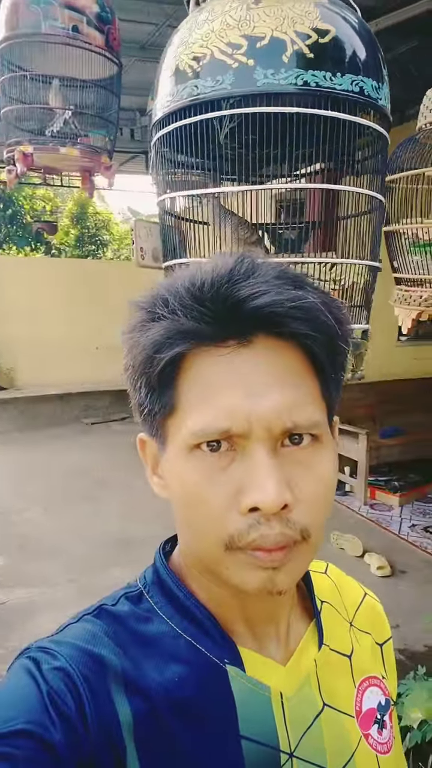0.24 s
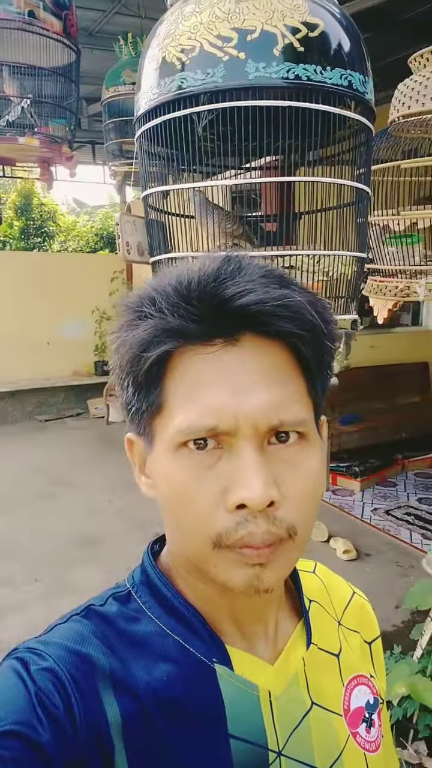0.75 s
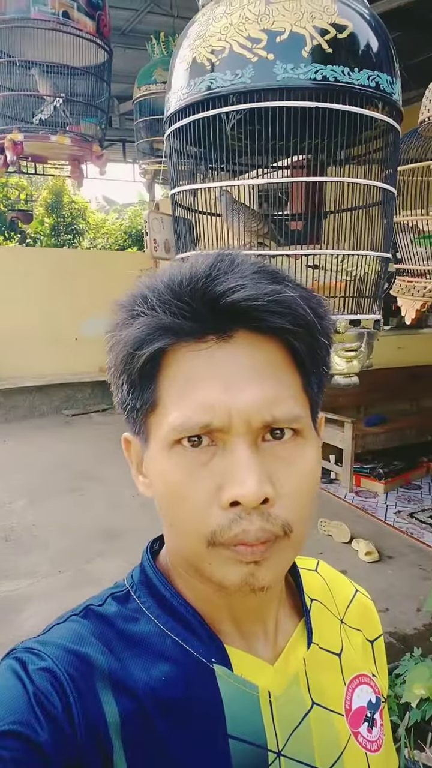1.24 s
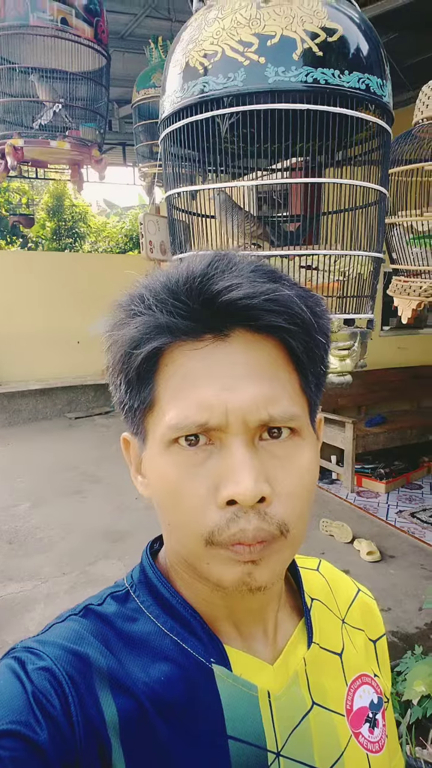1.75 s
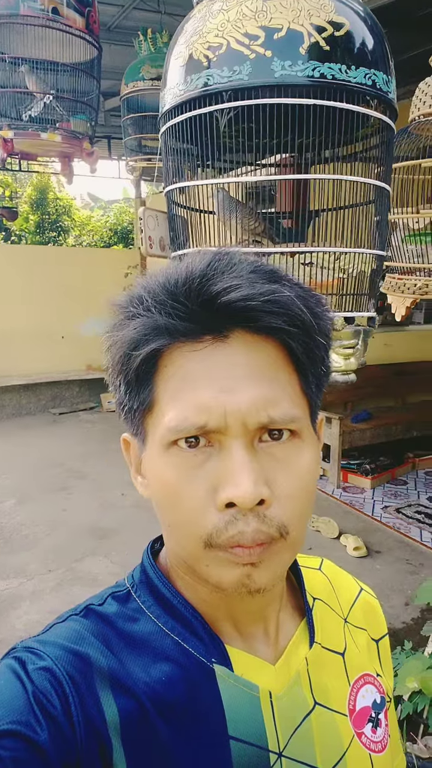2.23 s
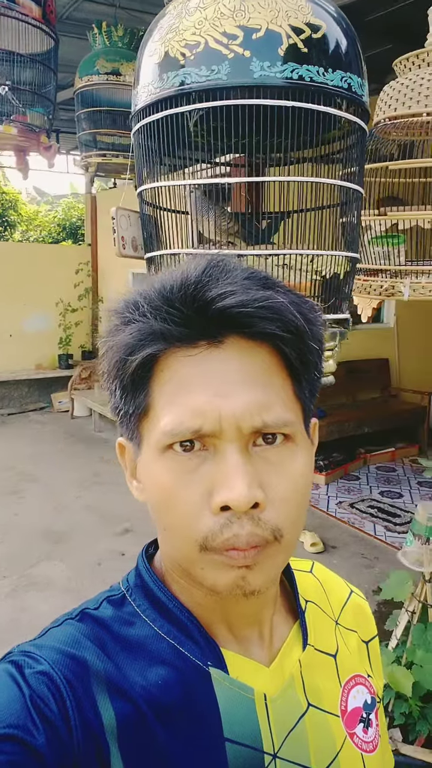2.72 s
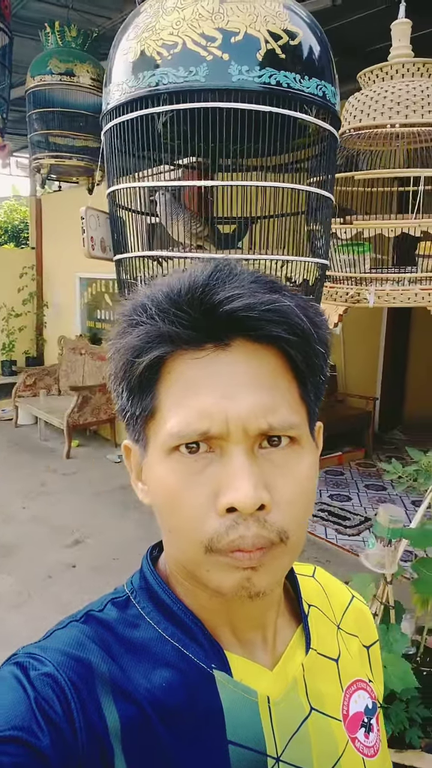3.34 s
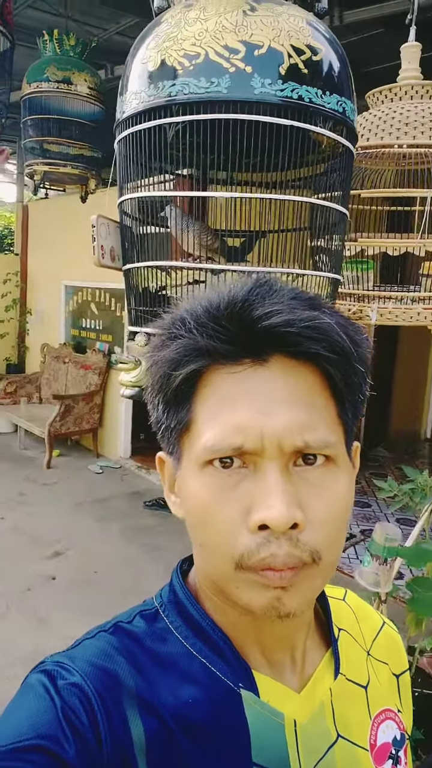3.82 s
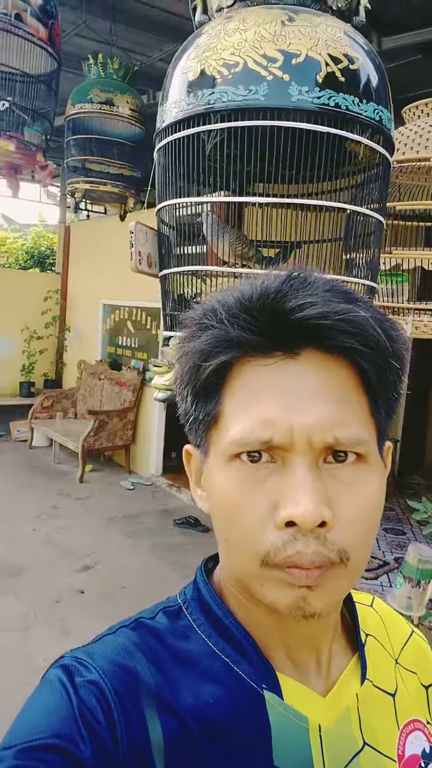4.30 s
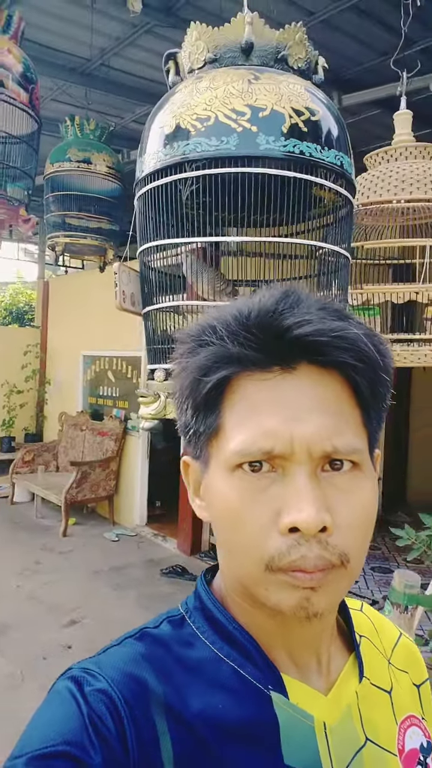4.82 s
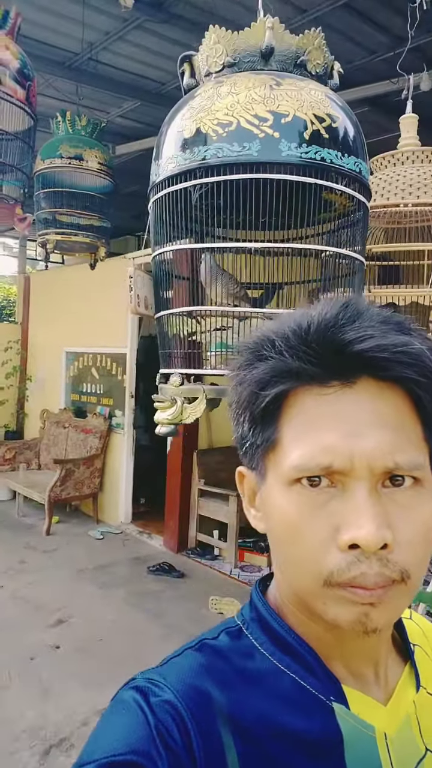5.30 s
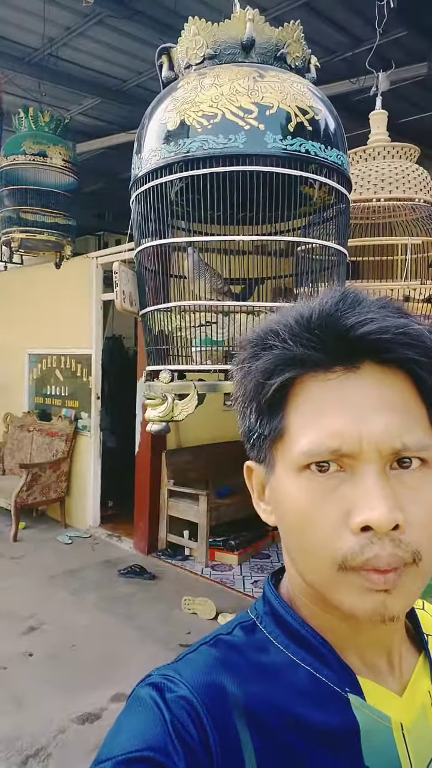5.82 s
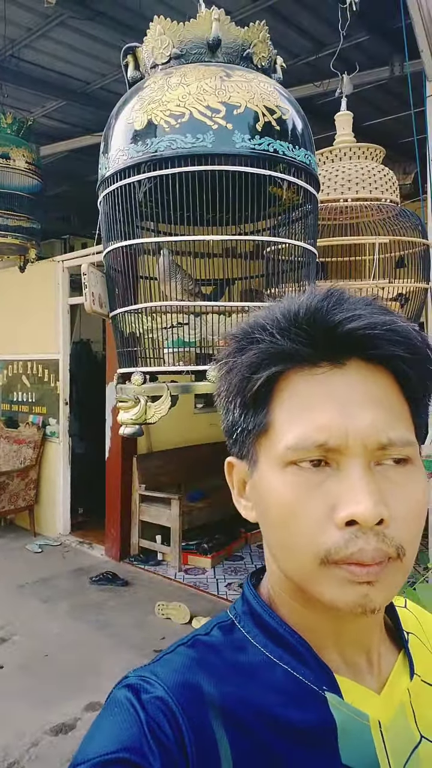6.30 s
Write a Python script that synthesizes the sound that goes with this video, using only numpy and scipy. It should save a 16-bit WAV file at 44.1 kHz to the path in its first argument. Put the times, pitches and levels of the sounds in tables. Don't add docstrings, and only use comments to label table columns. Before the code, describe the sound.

On a covered porch, a near dove sings a quick pulsed coo phrase at about two seconds and again past four. A second dove repeats one soft swelling note steadily between. Distant sparrows chirp with yard echo, a short whistle bursts in late, and claws tick on cage wire. Low motor and street rumble with hiss fade slightly. Handheld phone, no speech.

```python
import sys
import numpy as np
from scipy import signal
from scipy.fft import rfft, irfft, next_fast_len
from scipy.io import wavfile

SR = 44100
rng = np.random.default_rng(int(sys.argv[2]) if len(sys.argv) > 2 else 0)


def transcribe(u):
    v = np.clip(np.atleast_2d(u).T, -1, 1)
    q = np.round(v * 32767).astype(np.int16)
    wavfile.write(sys.argv[1], SR, q)


def gain_from_db(level_db):
    decades = np.asarray(level_db, float) / 20
    return 10 ** decades


N = 288855

# time in seconds, street level in dB.
STREET_FADE = [
    (0, -58),
    (.5, -57.5),
    (1.4, -60),
    (2.3, -59),
    (2.8, -61.5),
    (4.6, -61),
    (5.1, -63.5),
    (6.55, -64.5),
]
# frequency in Hz, density in dB per Hz.
STREET_COLOUR = [(35, -21), (60, -1), (111, -3), (165, -4.5), (446, -9.5), (534, -5), (663, -5.5),
                 (935, -8.5), (1120, -6.5), (1290, -9), (2310, -12.5), (3890, -21.5), (4500, -21.5),
                 (5850, -52.5), (9900, -120)]
# frequency in Hz, density in dB per Hz.
HISS_COLOUR = [(2060, -5.5), (3500, 2), (3900, -4), (4970, -2.5), (7650, -2), (9500, -15), (15100, -8),
               (16000, 14)]
STREET_MEAN_DB, HISS_DB = -61, -76
HISS_FOLLOWS = 1.24

# time in seconds, level in dB.
MOTOR_LOAD = [
    (0, 1.5),
    (2.5, 1.5),
    (2.75, -9),
    (4.3, 1.5),
    (4.9, -7.5),
    (6.55, -5.5),
]
# time in seconds, level in dB.
HAND_THUMPS = [
    (.84, -51),
    (2.22, -54),
    (2.5, -51),
    (4.38, -50),
    (5.03, -54),
]
MOTOR_HZ, MOTOR_SWAY_DB = 23.6, 2.5
RUMBLE_DB, FOURTH_DB, FIFTH_DB = -60.5, -62.5, -64
RUMBLE_FOLLOWS = 0.2

# time in seconds, dying time in seconds, level in dB.
PERCH_SHUFFLES = [(.03, .02, -56), (.4, .1, -59), (1.07, .12, -60), (1.37, 0.072, -50.5), (1.47, .12, -56),
                  (1.86, 0.086, -53.5), (2.05, .05, -60), (2.28, .08, -60), (2.9, .04, -55),
                  (3.14, .05, -60), (3.57, .1, -54.5), (4.17, 0.036, -51), (4.27, .02, -59),
                  (4.67, .05, -62), (5.23, 0.032, -57), (5.36, .05, -59), (5.52, 0.063, -54.5),
                  (5.93, .04, -57), (6.43, 0.066, -57)]
RUSTLE_DB, SHUFFLE_RISE_S = -60.5, 0.03
RUSTLE_FOLLOWS = 0.62
CLATTER_DB = 2

# start in seconds, length in seconds, start Hz, end Hz, level in dB.
NEAR_PIPS = [
    (.032, 0.013, 3810, 3180, -51.5),
    (.077, 0.015, 3920, 3380, -54.5),
    (.12, .014, 3560, 3300, -56),
    (.41, 0.015, 8050, 7300, -51.5),
    (5.667, 0.023, 3660, 3300, -51.5),
]

# time in seconds, peak level in dB, level of the dull part in dB.
WIRE_TICKS = [(0.079, -39, -3), (.1201, -38, -15), (1.0595, -41, -4), (1.3523, -40, -1), (1.4305, -38, -3),
              (1.4734, -36, 5.5), (2.3002, -33.5, -10), (2.4194, -47, 3), (2.7765, -42, -11),
              (2.895, -45, 0), (2.986, -45, -9), (3.1278, -44, -6), (3.5389, -41, -5), (3.5603, -33, -7.5),
              (3.5674, -39, -15), (3.5926, -31.5, -9), (3.685, -35, -17), (3.7035, -39, -18),
              (3.921, -47, -12), (4.1756, -43, -4), (4.2652, -37, -12), (4.6686, -38, -3),
              (5.1257, -46, -26), (5.222, -42, -4), (5.3542, -35, -26), (5.5244, -42, -12),
              (5.8616, -48, -20), (5.9174, -35, -10), (6.016, -34.5, -8)]
TICK_HZ = 14100

# start in seconds, length in seconds, start Hz, end Hz, level in dB.
FAR_CHIRPS = [(.40, .041, 8350, 7070, -64), (.45, .03, 6270, 5800, -67), (.47, .04, 5200, 4170, -66),
              (1.11, 0.045, 5840, 5270, -62.5), (1.16, 0.05, 5040, 4470, -65.5),
              (1.46, 0.041, 7800, 6080, -57), (2.205, 0.04, 7080, 6700, -51.5),
              (2.235, 0.027, 6430, 5280, -53), (2.30, 0.031, 6390, 4830, -49),
              (2.34, 0.014, 4760, 3920, -58), (2.61, 0.013, 7000, 6420, -58),
              (2.635, 0.027, 6260, 4730, -67), (3.62, .019, 8220, 6500, -61),
              (3.635, 0.038, 4830, 4420, -62), (4.505, .04, 4580, 4030, -65),
              (4.82, 0.027, 8800, 6400, -63), (4.83, .025, 6250, 5700, -56), (4.84, 0.035, 5530, 4430, -53),
              (5.365, 0.032, 7240, 6600, -57), (5.395, .034, 6250, 5260, -64.5),
              (5.665, .009, 4320, 3520, -52), (5.68, 0.0218, 2340, 1860, -62),
              (6.065, 0.017, 4130, 3300, -59)]
# start in seconds,
# length in seconds, start Hz, end Hz, level in dB.
SPARROW_CHEEPS = [(1.075, 0.03, 7370, 6430, -50), (1.47, 0.065, 5100, 4160, -61),
                  (1.545, 0.08, 5990, 4510, -48.5), (1.765, .054, 6235, 5000, -46.5),
                  (1.845, 0.032, 7500, 6550, -47.5), (4.14, 0.032, 8290, 7420, -62),
                  (5.36, .046, 15000, 13300, -59), (6.062, .068, 6165, 4580, -53),
                  (6.26, .058, 6210, 5060, -48.5), (6.405, 0.065, 6200, 4830, -48),
                  (6.41, 0.027, 7370, 6680, -49.5), (6.415, 0.031, 15000, 13500, -52.5)]
HOLD_PER_S = 22.0

TRILL_START_S, TRILL_RISE_S, TRILL_HOLD_S, TRILL_FALL_S = .62, .2, 0.42, 0.16
TRILL_DB, TRILL_ENTRY_DB, TRILL_EXIT_DB = -45.5, -12, -22
SYLLABLE_HZ, SYLLABLE_SAG_HZ_PER_S, SYLLABLES_PER_S = 2155, 91.2, 32

# start in seconds, length in seconds, start Hz, end Hz, level in dB.
WHISTLE_NOTES = [
    (5.333, 0.085, 3260, 3010, -56),
    (5.435, 0.059, 2670, 2960, -44),
    (5.455, 0.04, 3267, 3072, -42.5),
    (5.49, 0.064, 3144, 2896, -38),
    (5.518, .045, 2246, 2710, -39),
    (5.577, 0.028, 2727, 2738, -32),
    (.66, .066, 2445, 2478, -57),
    (.77, .075, 2440, 2374, -61),
]
# multiple of the pitch, level in dB.
WHISTLE_OVERTONES = [
    (2, -39),
    (4, -29.5),
    (5, -28),
]

# start in seconds, swell delay in seconds, top pitch in Hz, level in dB.
ANSWER_NOTES = [(1.663, .071, 1263, -40.5), (2.014, 0.086, 1268, -38.5), (2.26, 0.088, 1251, -35),
                (2.503, 0.095, 1247, -37), (2.76, 0.093, 1243, -36.5), (3.013, 0.101, 1242, -36.5),
                (3.27, 0.12, 1224, -36.5), (3.528, 0.1263, 1221, -36.5), (3.785, 0.12, 1226, -37.5),
                (4.042, 0.095, 1226, -40), (4.30, 0.068, 1227, -36)]
ANSWER_AFTER_S = 0.0439

# start in seconds, length in seconds, top pitch in Hz, onset pop in dB, body in dB.
COO_NOTES = [(1.797, .23, 1284, -22, -34), (1.995, 0.043, 1163, -31.5, -25),
             (2.071, 0.038, 1142, -22.5, -28.5), (2.142, 0.04, 1150, -23, -26),
             (2.221, 0.037, 1149, -24, -26), (2.328, .135, 1265, -23.5, -36),
             (4.188, 0.22, 1274, -25.5, -31.5), (4.416, 0.035, 1143, -28, -28),
             (4.488, 0.035, 1142, -26, -26.5), (4.559, 0.037, 1140, -27.5, -27.5),
             (4.651, 0.048, 1170, -27, -29.5), (4.81, 0.12, 1242, -26, -38)]
COO_START_HZ, ROLL_HZ = 837, 33.03
COO_FADE_DB, CLOSING_SWELL_DB = -6.5, 5
DROOP_HZ, DROOP_S = 89, 0.0048
# delay in seconds, level in dB.
NEAR_ECHOES = [
    (.0065, -15.5),
    (.017, -17),
]

PORCH_T60_S, YARD_T60_S = 0.62, 0.62
CUTOFF_HZ = 15830


def in_time(rows):
    s, *columns = np.transpose(rows)
    return [np.interp(np.arange(N) / SR, s, c) for c in columns]


def rms_one(x):
    return x / np.sqrt(np.mean(x ** 2) + 1e-20)


def drift(rate):
    points = rng.standard_normal(1000)
    return np.interp(np.arange(N) / SR * rate, np.arange(len(points)), points)


def band(x, low_hz, high_hz):
    return signal.sosfilt(signal.butter(2, [low_hz, min(high_hz, .45 * SR)], "band", fs=SR, output="sos"), x)


def add(out, s, note):
    at = round(s * SR)
    out[at:at + len(note)] += note[:N - at]


def tone(hz, edge_s, multiple=1):
    t = np.arange(len(hz)) / SR
    ends = np.sin(np.pi / 2 * np.clip(np.minimum(t, t[-1] - t) / edge_s, 0, 1)) ** 2
    return np.sqrt(2) * ends * np.sin(2 * np.pi * multiple * np.cumsum(hz) / SR)


def bursts(rows, floor_db, rise_s):
    t, power = np.arange(N) / SR, gain_from_db(2 * floor_db)
    for s, dies_s, db in rows:
        away = np.where(t < s, (s - t) / rise_s, (t - s) / dies_s)
        power = power + gain_from_db(2 * db) * np.exp(-2 * away)
    return np.sqrt(power)


def coloured(spectrum, patchy_db):
    size = next_fast_len(N)
    log_hz = np.log(np.maximum(np.arange(size // 2 + 1) * SR / size, 1))
    knots, level_db = np.log(np.array(spectrum)[:, 0]), np.array(spectrum)[:, 1]
    shaped = rfft(rng.standard_normal(size)) * gain_from_db(np.interp(log_hz, knots, level_db, left=-99, right=-99))
    together, out = drift(14.0), 0
    for mask in np.eye(len(knots)):
        flicker = gain_from_db(patchy_db * (1.44 * together + 0.67 * drift(6.0)))
        out = out + flicker * irfft(shaped * np.interp(log_hz, knots, mask), size)[:N]
    return rms_one(out)


def street_and_hiss(street_db, turn_db):
    street = gain_from_db(street_db + 7) * coloured(STREET_COLOUR, patchy_db=1.0)
    hiss = gain_from_db(HISS_DB + HISS_FOLLOWS * turn_db + 15.5) * coloured(HISS_COLOUR, patchy_db=0.37)
    return street + hiss


def motor():
    load_db, = in_time(MOTOR_LOAD)
    hz = MOTOR_HZ * (1 + 0.0317 * drift(3.4))
    fourth = gain_from_db(FOURTH_DB + MOTOR_SWAY_DB * drift(6.0))
    fifth = gain_from_db(FIFTH_DB + MOTOR_SWAY_DB * drift(6.0))
    orders = fourth * tone(hz, .001, multiple=4) + fifth * tone(hz, .001, multiple=5)
    thumps = [(s, .06, db) for s, db in HAND_THUMPS]
    rumble_gain = bursts(thumps, RUMBLE_DB + RUMBLE_FOLLOWS * load_db, rise_s=.06)
    rumble = rumble_gain * rms_one(band(rng.standard_normal(N), 20.3, 66.6))
    return gain_from_db(load_db) * orders + rumble


def rustle(turn_db):
    born = rng.random(N) < 900 / SR * gain_from_db(6.5 * drift(22.0))
    crackle_size = gain_from_db(2.1 * np.minimum(rng.exponential(1, N), 4))
    crackles = born * crackle_size * rng.choice([-1, 1], N)
    grain = rms_one(crackles) + gain_from_db(4) * rng.standard_normal(N)
    throb = np.sin(2 * np.pi * MOTOR_HZ * np.arange(N) / SR + 1.1)
    shuffles = bursts(PERCH_SHUFFLES, RUSTLE_DB + RUSTLE_FOLLOWS * turn_db, SHUFFLE_RISE_S)
    bright = band(grain, 13180, 18300) + gain_from_db(-1.0) * band(grain, 7100, 8360)
    return gain_from_db(CLATTER_DB * throb) * shuffles * rms_one(bright)


def glides(rows, overtones, edge_s, flutter_db, stepped, waver, swell_db, bend, hold_per_s=0):
    out, unsteady = np.zeros(N), 1 + waver * drift(140.0)
    for s, length, start_hz, end_hz, level_db in rows:
        way = np.linspace(0, 1, int(length * SR)) ** (bend + hold_per_s * length)
        way = way - np.clip(stepped, 0, 1) * np.sin(2 * np.pi * way) / (2 * np.pi)
        hz = (start_hz + (end_hz - start_hz) * way) * unsteady[round(s * SR):][:len(way)]
        upper = sum(gain_from_db(db) * tone(hz, edge_s, multiple=k) for k, db in overtones)
        swell = gain_from_db(level_db + swell_db * (way - .5))
        add(out, s, swell * (tone(hz, edge_s) + upper))
    return out * gain_from_db(flutter_db * drift(110.0))


def near_pips():
    return glides(NEAR_PIPS, [], 0.0044, flutter_db=0.0, stepped=0.26, waver=0.019, swell_db=-3.0, bend=0.99)


def ticks():
    out, white = np.zeros(N), rng.standard_normal((len(WIRE_TICKS), 400))
    snap = np.exp(-np.arange(white.shape[1]) / SR / 0.0025)
    for (s, peak_db, dull_db), noise in zip(WIRE_TICKS, white):
        bright = band(noise * snap, 1.042 * TICK_HZ, 1.7 * TICK_HZ)
        dull = gain_from_db(dull_db) * band(noise * snap, 6700, 7840)
        add(out, s, gain_from_db(peak_db + 4.0) * (bright + dull))
    return out


def small_birds():
    chirps = glides(FAR_CHIRPS, [(2, -20.0)], 0.003, flutter_db=7.5, stepped=0.46, waver=0.0156,
                    swell_db=3.5, bend=1.02)
    cheeps = glides(SPARROW_CHEEPS, [(2, -24.0)], 0.0024, flutter_db=4.5, stepped=0.26, waver=.012,
                    swell_db=3.0, bend=.7, hold_per_s=HOLD_PER_S)
    return chirps + cheeps


def trill():
    t = np.arange(N) / SR - TRILL_START_S
    corners = np.cumsum([0, TRILL_RISE_S, TRILL_HOLD_S, TRILL_FALL_S])
    level_db = TRILL_DB + np.interp(t, corners, [TRILL_ENTRY_DB, 0, 0, TRILL_EXIT_DB])
    hz = SYLLABLE_HZ - SYLLABLE_SAG_HZ_PER_S * np.clip(t - TRILL_RISE_S, 0, 1)
    cycle = np.cumsum(SYLLABLES_PER_S + 1.46 * drift(9.1)) / SR % 1
    pulse = np.sin(np.pi * cycle) ** 3
    syllables = pulse * tone(hz + 420 * (cycle - .5), .01)
    return (t > 0) * (t < corners[-1]) * gain_from_db(level_db + 2.5) * syllables


def whistler():
    return glides(WHISTLE_NOTES, WHISTLE_OVERTONES, 0.0078, flutter_db=3.5, stepped=.05, waver=0.0085,
                  swell_db=0.5, bend=0.694)


def second_dove():
    waver = drift(60.0)
    out, husky = np.zeros(N), gain_from_db(6.7 * waver)
    for s, swell_s, top_hz, level_db in ANSWER_NOTES:
        t = np.arange(int((swell_s + ANSWER_AFTER_S) * SR)) / SR
        slide_hz = 250 * np.exp(-(t / 0.048) ** 1.474)
        droop_hz = 60 * np.exp((t - t[-1]) / .015)
        hz = top_hz + 12 * waver[round(s * SR):][:len(t)] - slide_hz - droop_hz
        soft = gain_from_db(-17) * np.clip(t / .025, 0, 1)
        slide = soft * husky[round(s * SR):][:len(t)]
        swell = gain_from_db(level_db) * (slide + np.exp(-np.abs((t - swell_s) / 0.031) ** 2.05))
        octave = gain_from_db(level_db - 22) * np.clip(t / 0.071, 0, 1) ** 2 * tone(hz, 0.014, multiple=2)
        add(out, s, swell * tone(hz, 0.014) + octave)
    return out


def near_dove():
    out, white = np.zeros(N), rng.standard_normal((len(COO_NOTES), 2000))
    for (s, length, top_hz, pop_db, body_db), noise in zip(COO_NOTES, white):
        closing = .08 < length < .18
        fade_db = CLOSING_SWELL_DB if closing else COO_FADE_DB
        t = np.arange(int(length * SR)) / SR
        leap_s = 0.01064 + 0.0525 * length
        roll = np.clip((length - .15) / .05, 0, 1) * np.sin(2 * np.pi * ROLL_HZ * t + 1.4)

        held = 0.12 + 1.184 * length
        sag = np.clip((t / length - held) / (1 - held), 0, 1) ** 1.157
        sag_hz = min(165, 9000 * length ** 2) * sag
        droop_hz = DROOP_HZ * np.exp((t - length) / DROOP_S)
        aim = top_hz - sag_hz + 30 * roll - droop_hz
        climb = 1 / (1 + np.exp(-(t - leap_s) / (0.21 * leap_s)))
        hz = COO_START_HZ + (aim - COO_START_HZ) * climb

        pop = gain_from_db(pop_db) * np.exp(-((t - 0.81 * leap_s) / (0.24 * leap_s)) ** 2)
        rolled_db = (3.0 + 1.4 * t / length) * roll
        opening = np.clip((t - 1.045 * leap_s) / 0.0093, 0, 1)
        body = gain_from_db(body_db + fade_db * (t / length - .5) + rolled_db) * opening
        add(out, s, (pop + body) * tone(hz, 0.004))

        puff_s = np.arange(len(noise)) / SR
        puff = noise * np.exp(-((puff_s - .02) / (.001 + 0.031 * length)) ** 2)
        add(out, s - .016, gain_from_db(pop_db + 5.0) * band(band(puff, 670, 1440), 718, 1170))
    for delay_s, echo_db in NEAR_ECHOES:
        add(out, delay_s, gain_from_db(echo_db) * out.copy())
    return out


def porch(x, onset_s, t60_s, early_db):
    t = np.arange(int(.8 * SR)) / SR
    crowded = 1 + gain_from_db(early_db) * np.exp(-t / 0.0058)
    shape = gain_from_db(-60 * t / t60_s) * crowded * np.clip(t / onset_s - 1, 0, 1)
    tail = rng.standard_normal(len(t)) * shape
    return signal.fftconvolve(x, tail / np.sqrt(np.sum(tail ** 2)))[:N]


def scene():
    street_db, = in_time(STREET_FADE)
    turn_db = street_db - STREET_MEAN_DB
    background = street_and_hiss(street_db, turn_db)
    dove, answer, snaps, far_trill = near_dove(), second_dove(), ticks(), trill()
    chirps, pips, whistle = small_birds(), near_pips(), whistler()

    direct = gain_from_db(-0.5) * dove + gain_from_db(-2.5) * answer + snaps + pips
    direct = direct + gain_from_db(0.5) * whistle + gain_from_db(-5.0) * far_trill + gain_from_db(-8) * chirps
    near_send = gain_from_db(-14.0) * dove + gain_from_db(-10.5) * answer + gain_from_db(-4) * snaps
    far_send = gain_from_db(4) * chirps + gain_from_db(-1.5) * whistle + gain_from_db(-1.5) * far_trill + gain_from_db(-4.5) * pips
    near_wet = porch(near_send, onset_s=0.0066, t60_s=PORCH_T60_S, early_db=2)
    far_wet = porch(far_send, onset_s=0.0021, t60_s=YARD_T60_S, early_db=-4.5)
    return (direct + near_wet + far_wet + background + motor() + rustle(turn_db))[None]


def band_limit(x):
    return signal.sosfilt(signal.butter(12, 17040, fs=SR, output="sos"), x)


def record(dry):
    top_cut = signal.cheby2(14, 50, CUTOFF_HZ * 1.01, fs=SR, output="sos")
    return band_limit(signal.sosfilt(top_cut, dry))


dry = scene()
out = record(dry)
transcribe(out)
```